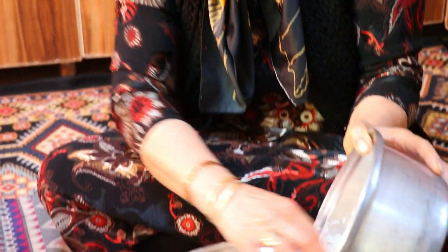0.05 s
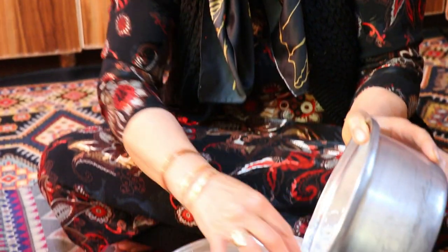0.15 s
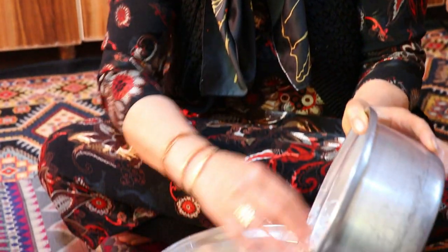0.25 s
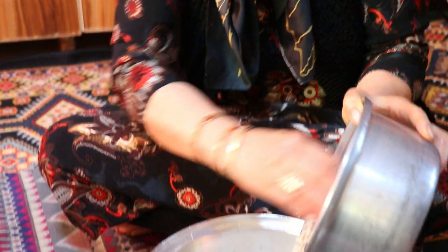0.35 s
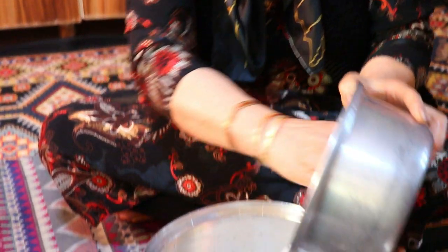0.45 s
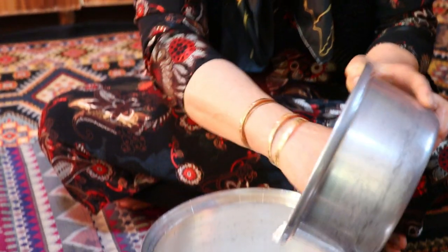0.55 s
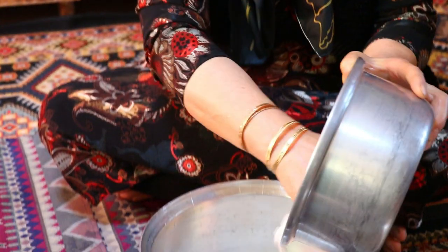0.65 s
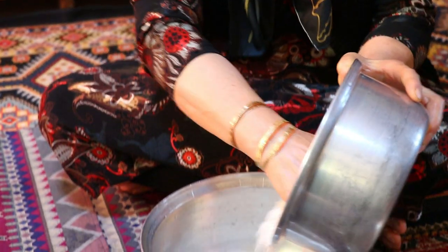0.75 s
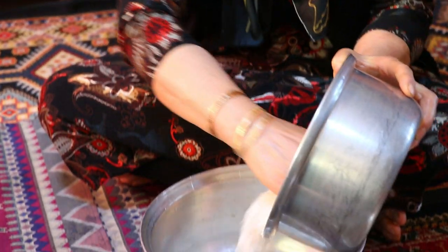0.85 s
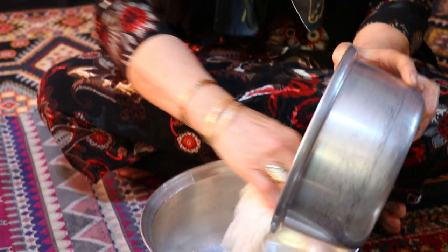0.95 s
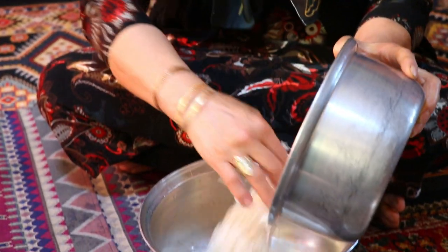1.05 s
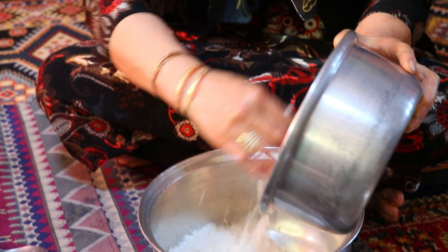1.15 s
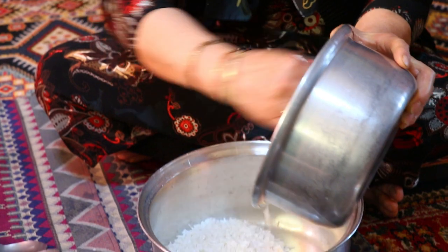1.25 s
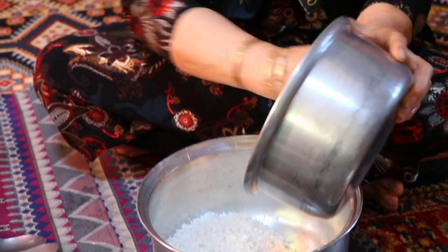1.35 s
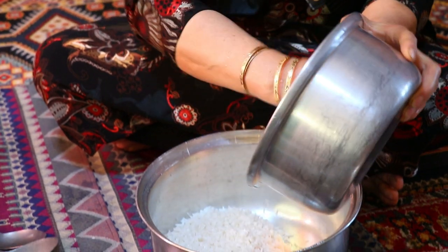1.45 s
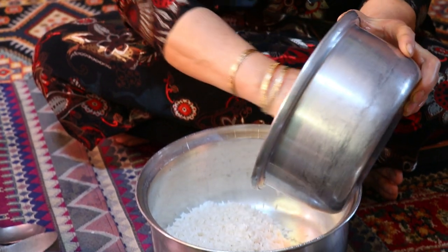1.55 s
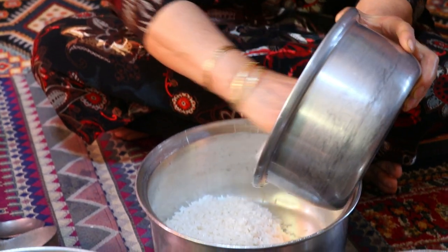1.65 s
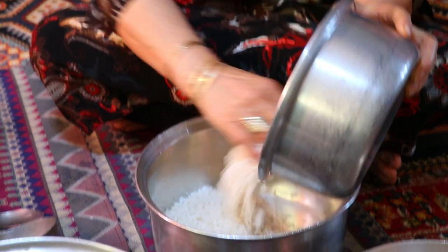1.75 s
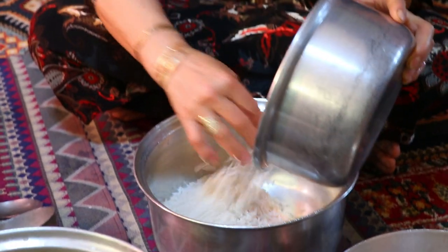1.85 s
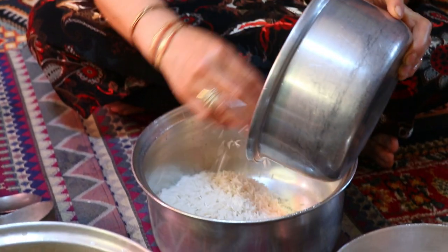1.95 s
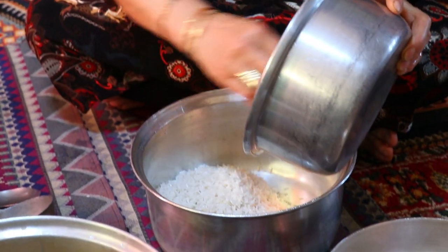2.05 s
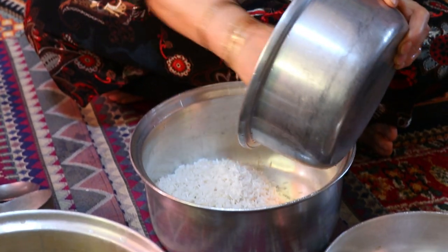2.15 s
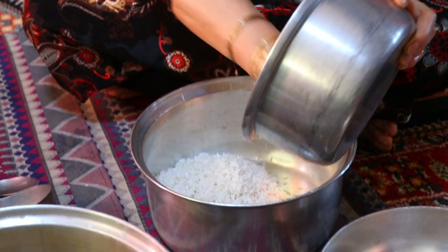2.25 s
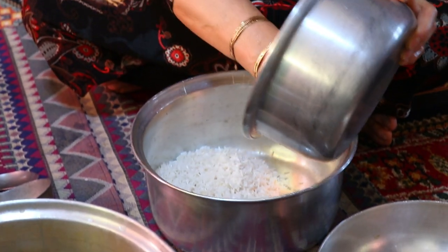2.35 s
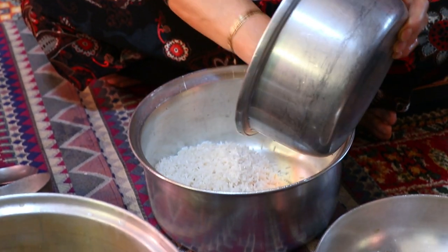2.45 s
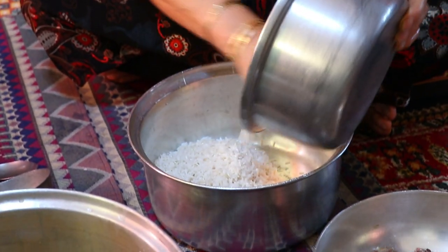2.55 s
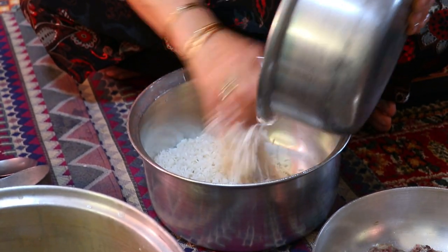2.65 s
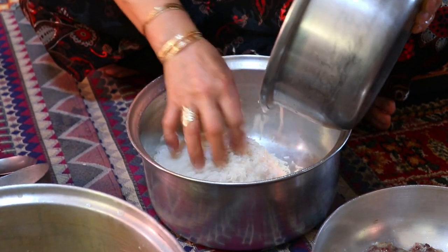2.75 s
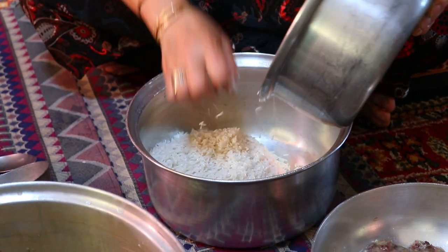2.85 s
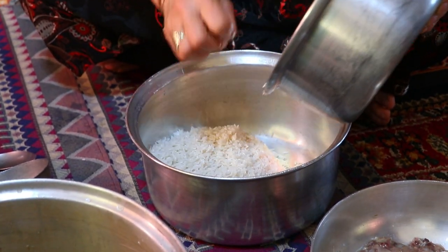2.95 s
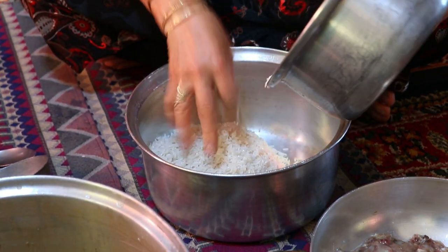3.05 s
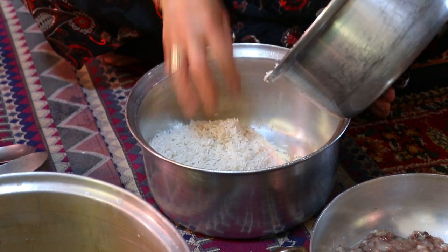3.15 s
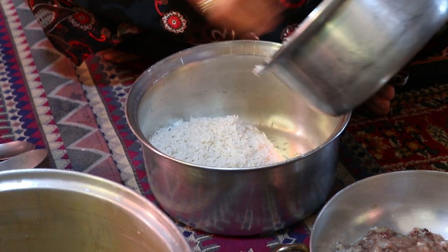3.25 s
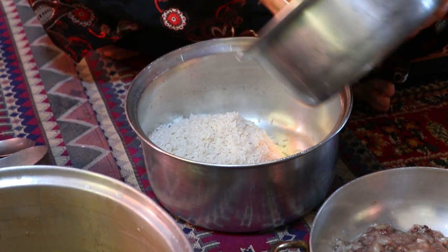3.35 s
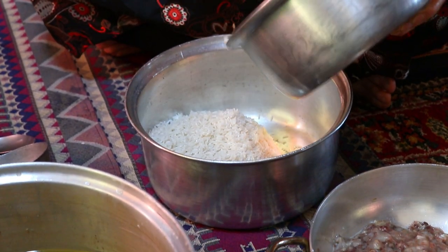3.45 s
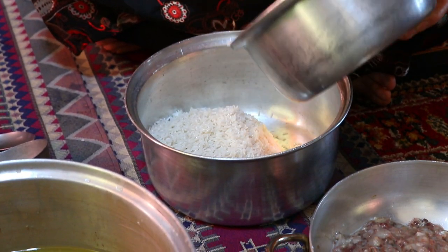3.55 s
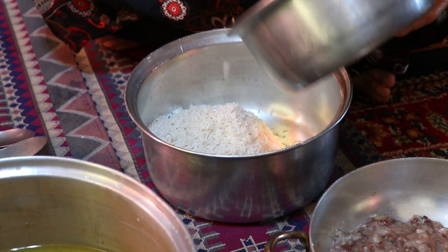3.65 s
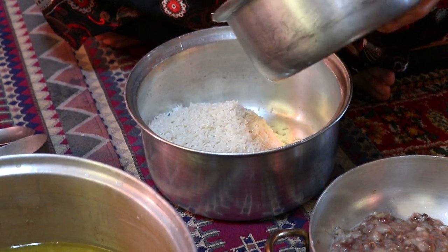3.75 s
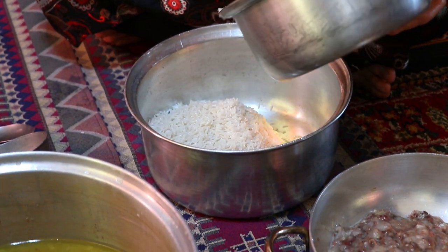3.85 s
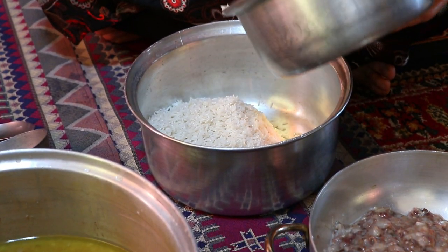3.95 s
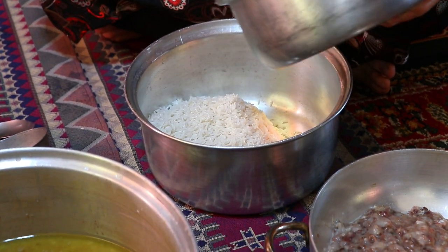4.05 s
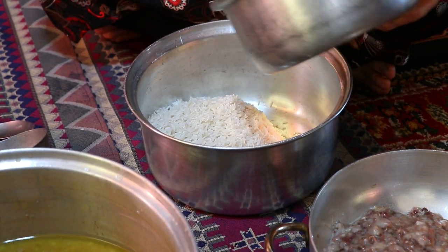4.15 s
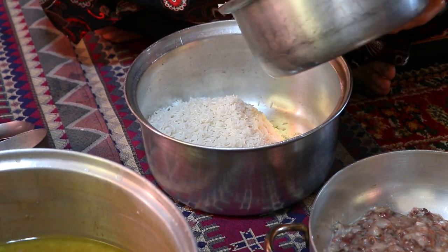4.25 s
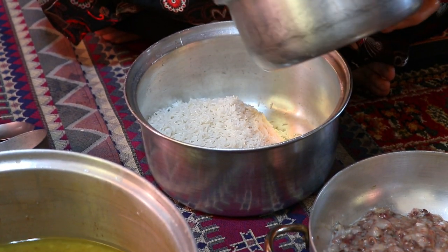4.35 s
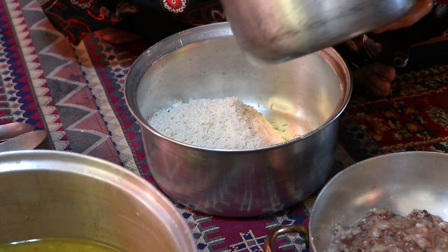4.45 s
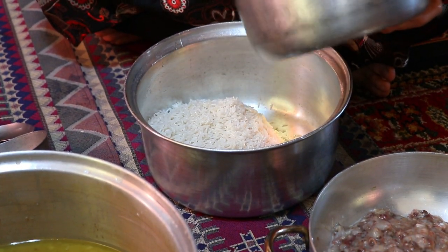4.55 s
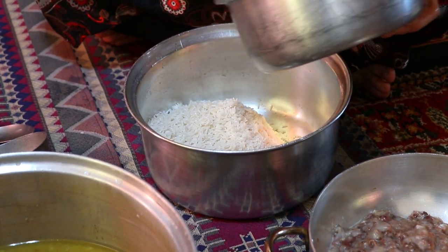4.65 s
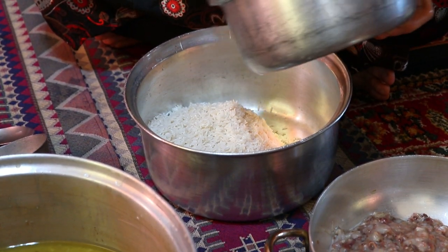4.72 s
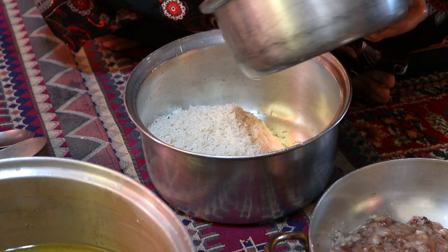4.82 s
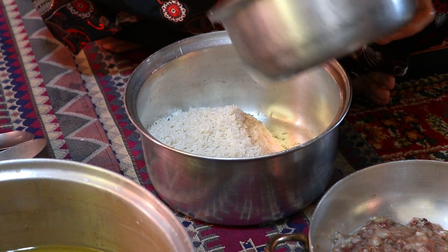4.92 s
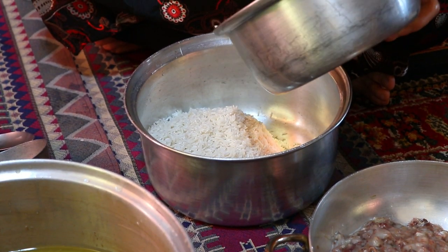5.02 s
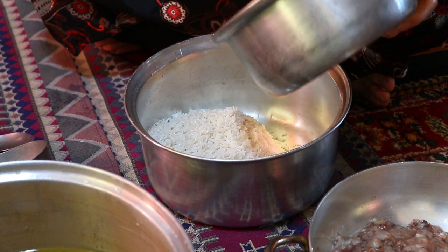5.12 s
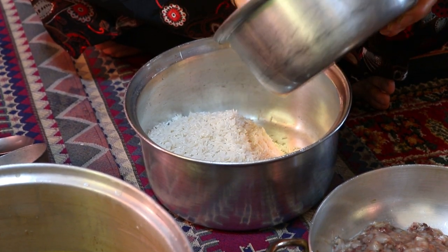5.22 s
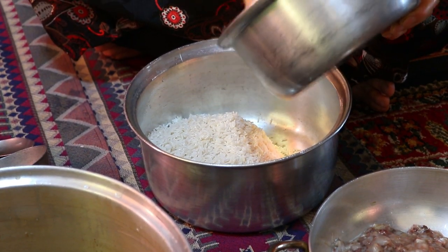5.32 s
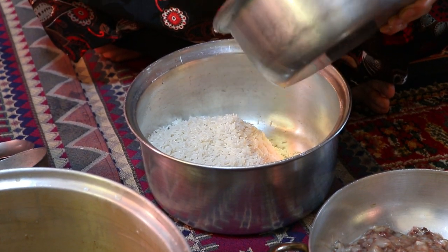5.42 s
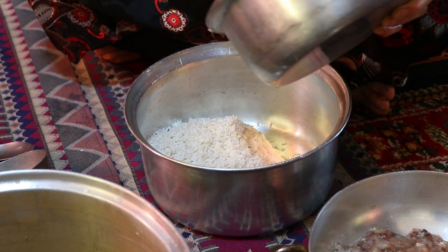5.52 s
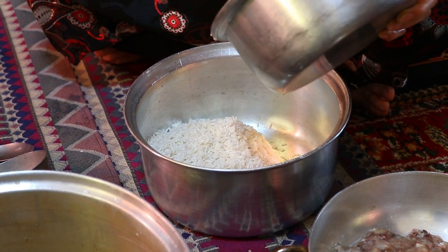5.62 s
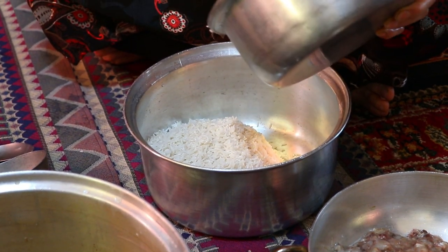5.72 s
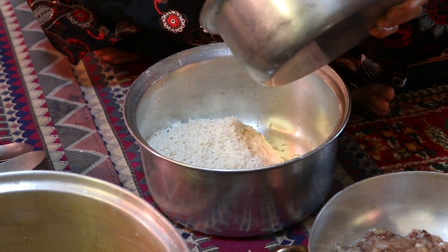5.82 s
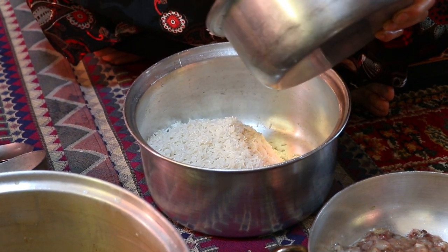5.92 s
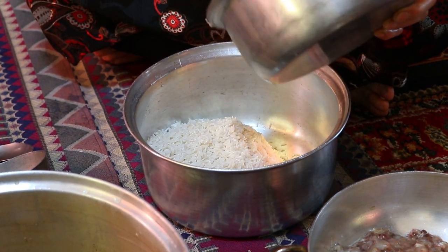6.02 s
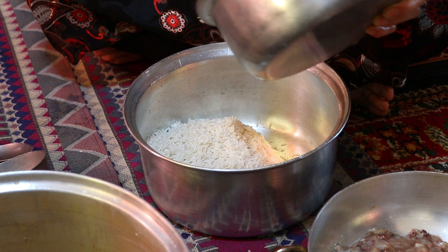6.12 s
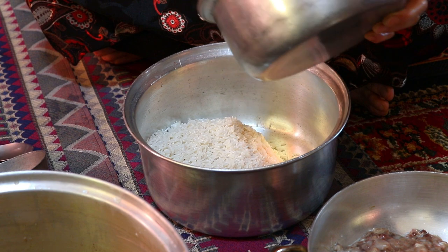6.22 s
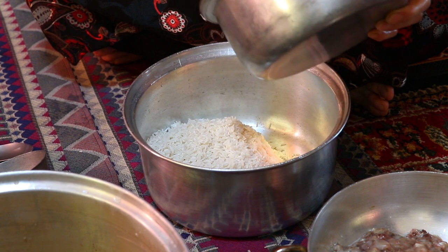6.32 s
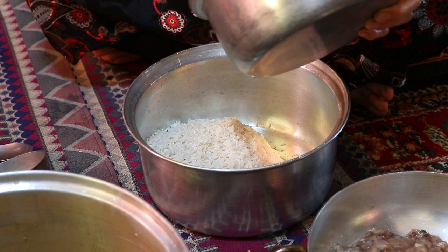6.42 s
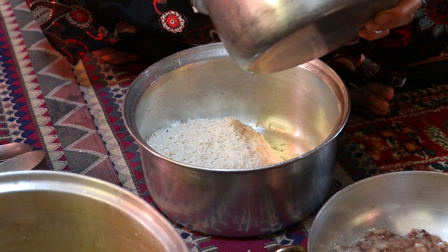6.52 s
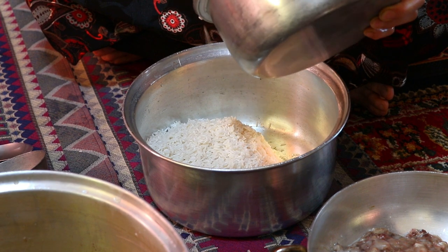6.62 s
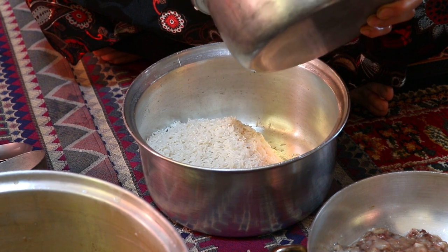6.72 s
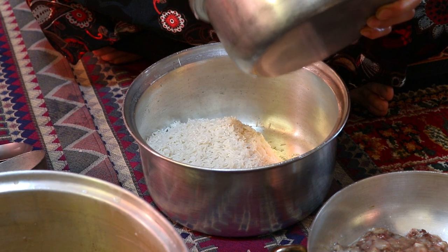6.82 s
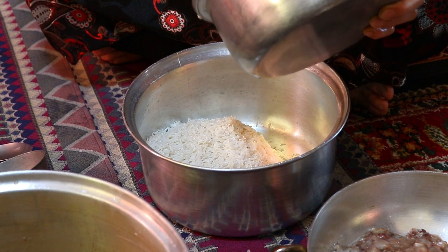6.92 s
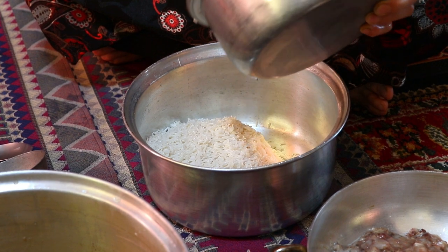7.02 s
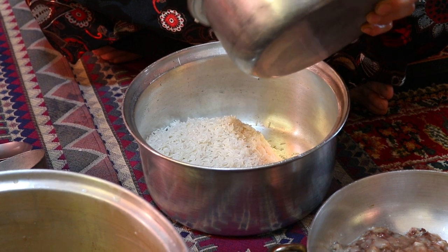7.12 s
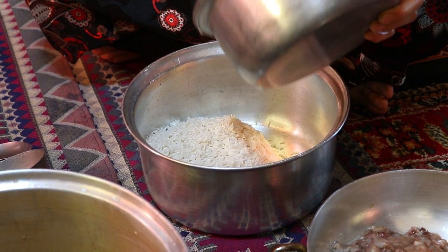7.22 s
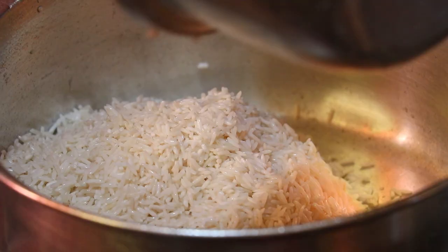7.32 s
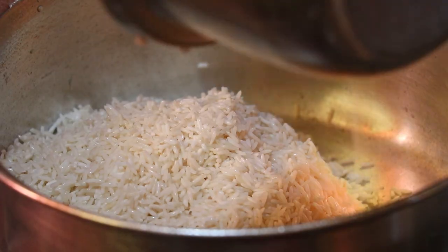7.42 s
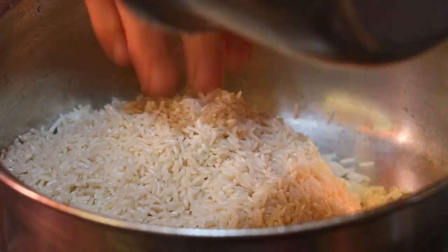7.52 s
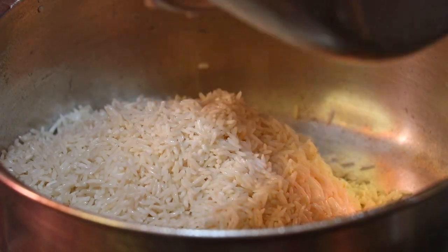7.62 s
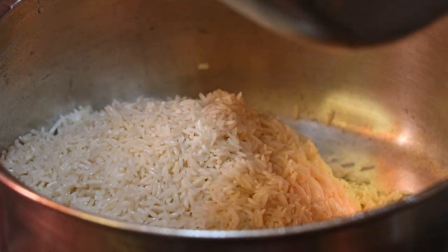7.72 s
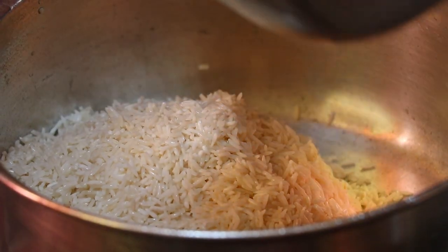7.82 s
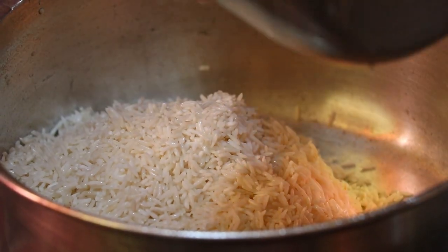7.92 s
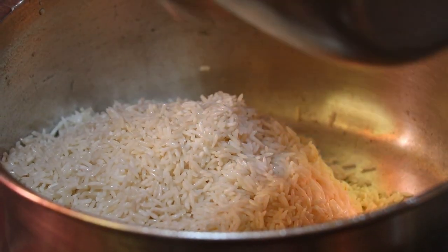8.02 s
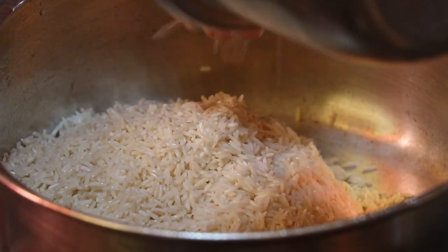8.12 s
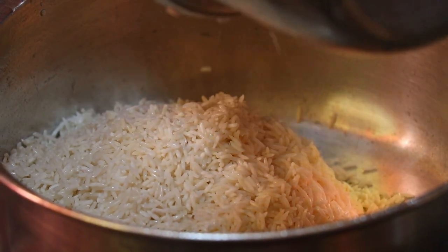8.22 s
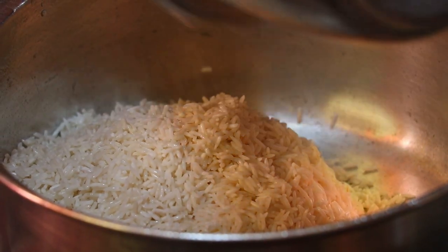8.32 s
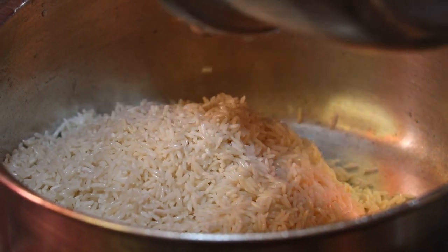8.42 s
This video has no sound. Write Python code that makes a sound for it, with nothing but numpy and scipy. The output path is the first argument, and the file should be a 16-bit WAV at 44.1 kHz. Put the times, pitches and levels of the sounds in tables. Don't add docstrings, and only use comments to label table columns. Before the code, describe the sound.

Dry rice rustles and scrapes out of a metal pot as bangles tick, then sparser dull knocks and rubs on the emptied pot in a quiet carpeted room.

```python
import sys
import numpy as np
from scipy import signal
from scipy.fft import rfft, irfft, next_fast_len
from scipy.io import wavfile
from scipy.ndimage import uniform_filter1d

SR = 44100
rng = np.random.default_rng(int(sys.argv[2]) if len(sys.argv) > 2 else 0)


def store_pcm(level_fs):
    pcm = np.round(np.clip(level_fs, -1, 1) * 32767).astype(np.int16)
    wavfile.write(sys.argv[1], SR, np.atleast_2d(pcm).T)


def volts(x):
    e = np.asarray(x, float) / 20
    return 10 ** e


N = 373527

# (frequency [Hz], level [dB], t60 [s])
FULL_BELLY_MODES = [(208.6, -15.5, 0.46), (323, -9, 0.37), (377.9, -4, 0.4), (415.86, -5, 0.42),
                    (479.5, 1.5, 0.1), (543.4, -6.5, 0.29), (600, 4, 0.057), (682, -4.5, 0.17),
                    (1030, -16, 0.083), (1150, -19.5, 0.055), (1485, -5.5, 0.31)]
FULL_WALL_MODES = [(1050, 3.5, 0.059), (1410, -6, 0.18), (1620, -2, 0.051), (2296, 5, 0.34),
                   (2574, 9, 0.24), (2990, 5.5, 0.23), (3250, -15, 0.045), (3770, -17, 0.04),
                   (4060, 13, 0.32), (4180, 12, 0.24), (4480, 0, 0.047), (5040, 13, 0.073)]
# (frequency [Hz], level [dB], t60 [s])
EMPTY_BELLY_MODES = [(391.8, 5, 0.0283), (614, -1, 0.03), (728, 3.5, 0.067), (820, -7.5, 0.037),
                     (1087, 2.5, 0.051), (1204, 2.5, 0.045), (1340, -5, 0.025)]
EMPTY_WALL_MODES = [(1608, -3, 0.047), (2059, 0, 0.0398), (2254, -3.5, 0.049), (2845, 4.5, 0.032),
                    (3160, 2.5, 0.038), (3520, -5, 0.0365), (4060, -9, 0.05)]
# (frequency [Hz], density [dB per Hz])
SNAP_SPECTRUM = [(410, -19.5), (700, -8.5), (1780, -11), (2570, -8.5), (3960, -10.5), (5280, -7.5),
                 (7820, -1.5), (14700, -21), (16100, -33)]
EMPTIED_S = 3.0
BUZZ = dict(longest_s=0.15, rough=0.45)


def evened(x):
    return x / np.sqrt(np.mean(x ** 2) + 1e-20)


def read(points, hz):
    f, value = np.transpose(points)
    return np.interp(np.log(hz + 1), np.log(f + 1), value)


def add(mix, s, sound):
    part = mix[:, round(s * SR):][:, :sound.shape[1]]
    part += sound[:, :part.shape[1]]


def through(x, taps):
    return signal.oaconvolve(x, np.atleast_2d(taps), axes=1)[:, :N]


def drift(samples):
    once = uniform_filter1d(rng.standard_normal(N), samples)
    return evened(uniform_filter1d(once, samples))


def colour(spectrum):
    db = np.maximum(read(spectrum, abs(np.fft.fftfreq(4096, 1 / SR))), -100)
    phased = np.exp(np.conj(signal.hilbert(np.log(volts(db)))))
    taps = np.fft.ifft(phased).real[:2048]
    return taps / np.linalg.norm(taps)


def resonate(x, hz, width_hz):
    turn = np.exp(2j * np.pi * np.cumsum(hz) / SR)
    r = np.exp(-np.pi * width_hz / SR)
    return 2 * (turn * signal.lfilter([1 - r], [1, -r], x / turn + 1e-18)).real


def ring(modes, crowd, spread, count=1, longest_s=0.45, rough=0., spot_db=0.5):
    hz, db, t60 = np.repeat(modes, 3, axis=0).T
    hz = hz * (1 + crowd * np.tile([-1, 0, 1.3], len(modes)))
    t = np.arange(SR // 4) / SR
    fade = volts(db[:, None] - 60 * t / np.clip(t60, .01, longest_s)[:, None])
    waves = fade * np.exp(2j * np.pi * hz[:, None] * t)
    spot, phase, left, right = rng.standard_normal((count, len(hz), 4)).T[..., None]
    sides = spread * np.sqrt(hz / 1000)[:, None, None] * np.concatenate([left, right], 2)
    weights = volts(spot_db * spot) * np.exp(1j * (phase + sides))
    out = np.einsum("mcp,mt->cpt", weights, waves, optimize=True).imag
    out = out * np.minimum(t / 0.0004, 1)
    rattle = uniform_filter1d(rng.standard_normal((count, 1, len(t))), size=150)
    out = out * (1 + rough * evened(rattle))
    return out / np.linalg.norm(out[:, :1], axis=2, keepdims=True)


def air():
    # (frequency [Hz], density [dB per Hz])
    hush_spectrum = [(12, -25), (20, -8), (123, 0.5), (389, -7.5), (447, -3), (783, -10.5), (3170, -17.5),
                     (4830, -26), (6390, -20.5), (9200, -22), (14800, -32.5), (16100, -45)]
    # (frequency [Hz], left-right likeness [0..1])
    likeness = [(30, 0.79), (150, 0.83), (600, 0.27), (2000, 0.053), (12000, 0.031)]
    # (time [s], width [s], level [dB])
    creaks = [
        (2.85, 0.076, 0.87),
        (5.2, 0.26, 3.5),
        (7.122, 0.031, 11.3),
        (8.0, 0.12, 1.9),
        (8.3, 0.11, 5.9),
    ]
    # (frequency [Hz], level [dB])
    motor = [(441.4, -68.5)]
    frames, hz = N // 256 + 5, np.fft.rfftfreq(1024, 1 / SR)
    a, b, c, d, patches = rng.standard_normal((frames, 513, 5)).T
    patches = evened(uniform_filter1d(uniform_filter1d(patches, 5, 0), 30, 1))
    same = np.clip(read(likeness, hz), -1, 1)[:, None]
    left = a + 1j * b
    z = np.array([left, same * left + np.sqrt(1 - same ** 2) * (c + 1j * d)])
    z *= volts(read(hush_spectrum, hz)[:, None] + 2.0 * patches)
    t = (np.arange(frames) - 2) * 256 / SR
    creak_db = sum(db * np.exp(-((t - s) / w) ** 2) for s, w, db in creaks)
    z *= volts((hz < 240)[:, None] * creak_db)
    hush = volts(-60) * evened(signal.istft(z, nperseg=1024, noverlap=768)[1][:, :N])
    waver = 2.5 + 2.2 * drift(6000)
    hum = sum(volts(db + waver) * np.sin(2 * np.pi * f * np.arange(N) / SR) for f, db in motor)
    return hush + hum


def room(x):
    # (frequency [Hz], t60 [s])
    decay = [(250, 0.19), (1000, 0.47), (4000, 0.29), (12000, 0.28)]
    taps = np.zeros((2, SR // 2))
    slots = np.arange(200, SR // 2 - 20, 20)
    at = slots + rng.integers(0, 20, (2, len(slots)))
    np.put_along_axis(taps, at, rng.choice([-1., 1.], at.shape), 1)
    hz, t, z = signal.stft(taps, SR, nperseg=256)
    tail = signal.istft(z * volts(-60 * t / read(decay, hz)[:, None]), SR, nperseg=256)[1]
    return through(x.mean(0)[None], tail / np.linalg.norm(tail[0]))


def ticks():
    # (time [s], peak [dB], ring [Hz])
    bangles = [(0.0732, -11.5, 7450), (0.125, -22, 7000), (0.153, -20, 7230), (0.1784, -12, 8520),
               (0.196, -29, 8000), (0.262, -26, 7000), (0.33, -21.5, 7540), (0.391, -26, 6860),
               (0.4114, -25.5, 9280), (0.4576, -20.5, 7770), (0.4933, -23, 6750), (0.557, -35, 6940),
               (0.843, -20, 7980), (1.106, -24, 7060), (1.151, -24.5, 7500), (1.237, -44, 5940),
               (1.2665, -33, 7310), (1.359, -34.5, 8760), (1.3857, -37, 8000), (1.403, -30.5, 8400),
               (1.48, -30.5, 8100), (1.736, -37, 7060), (1.8361, -28.5, 7460), (1.921, -27, 8600),
               (1.9386, -27, 7770), (1.963, -32, 7000), (1.976, -35, 7200), (2.161, -40.5, 7820),
               (2.189, -41, 6760), (2.211, -37, 7000), (2.736, -29.5, 7050), (2.775, -23.5, 8400),
               (2.794, -28, 7600), (2.8409, -35, 7500), (2.909, -24, 7900), (2.946, -34, 5800),
               (2.972, -33, 7000), (3.1347, -36.5, 7850), (3.6787, -30, 8600), (4.4734, -27.5, 6540),
               (4.807, -65, 7800), (4.95, -36, 8100), (4.9832, -46, 8500), (5.1504, -36, 8500),
               (5.351, -47, 8050), (5.412, -42, 7760), (6.471, -41, 8800), (7.2124, -40, 6700),
               (7.3912, -32.5, 7560), (7.561, -36, 7100), (7.6213, -27.5, 7050)]
    # (time [s], peak [dB], ring [Hz], t60 [s])
    strays = [(0.5864, -31.5, 1825, 0.099), (0.587, -25, 3770, 0.017), (0.8028, -24.5, 4060, 0.028),
              (0.967, -29, 4105, 0.066), (1.6019, -25, 2447, 0.076), (2.0552, -28, 4700, 0.035),
              (2.2229, -13, 2440, 0.024), (2.5341, -20.5, 4250, 0.054), (2.4595, -32, 3550, 0.022),
              (2.5223, -28, 3330, 0.014), (3.19, -43.5, 2385, 0.16), (3.2345, -31, 4200, 0.032),
              (3.362, -39, 2630, 0.016), (3.5117, -49, 3300, 0.0346), (3.895, -36, 3054, 0.053),
              (4.125, -34, 1410, 0.018), (4.2, -28, 2940, 0.018), (4.781, -40.5, 2150, 0.089),
              (4.9836, -37, 3210, 0.025), (6.6709, -36, 2250, 0.035), (7.1023, -21, 3150, 0.0086),
              (7.2105, -38.5, 3240, 0.035), (7.248, -34, 940, 0.013), (7.416, -33.5, 2840, 0.0255),
              (7.5275, -23, 2464, 0.021), (7.6075, -27.5, 1390, 0.012), (8.4175, -43, 6000, 0.027),
              (8.434, -35.5, 2890, 0.034)]
    bangle_t60 = 0.035
    out, t, snap = np.zeros((2, N)), np.arange(SR // 8) / SR, colour(SNAP_SPECTRUM)
    for s, db, hz, t60 in strays + [(*row, bangle_t60) for row in bangles]:
        fade = volts(-60 * t / np.clip(t60, .008, .4)) * np.minimum(t / 0.0013, 1)
        a, b = rng.standard_normal((2, len(t)))
        broad = signal.oaconvolve([a, 0.46 * a + 1.14 * b] * fade, snap[None], axes=1)[:, :len(t)]
        near_ring = resonate(fade * np.array([a, b]), hz + 0 * t, hz / 5)
        turns = hz * np.array([[1], [1.04], [1.31], [1.58]]) * t + rng.random((4, 1))
        partials = ([[1], [.7], [.15], [.15]] * np.sin(2 * np.pi * turns)).sum(0) * fade ** 0.44
        add(out, s, 0.34 * volts(db) * (0.62 * broad + near_ring))
        add(out, s, 0.16 * np.sqrt(1800 / hz) * volts(db) * partials[None])
    return out


def strike():
    # (time [s], peak [dB], left-right [dB])
    blows = [
        (5.548, -14.5, -3.5),
    ]
    # (frequency [Hz], level [dB], t60 [s])
    struck_modes = [(1030, -9.5, 0.07), (1648, -29, 0.048), (2053, 8, 0.038), (2015, -10, 0.28),
                    (1300, -10.5, 0.033), (3035, -24, 0.077), (2500, -39.5, 0.05), (2770, -4.5, 0.069),
                    (3940, 5, 0.0087), (7000, -18.5, 0.099), (7700, -15, 0.092), (8400, -23, .1)]
    out = np.zeros((2, N))
    for s, db, pan_db in blows:
        side = volts(db + pan_db * np.array([[.5], [-.5]]))
        add(out, s, 3.1 * side * colour(SNAP_SPECTRUM))
        add(out, s + 0.00057, 10.0 * side * ring(struck_modes, 0.0123, 0.042)[0])
    return out


def gesture(length, rise_s, change_db, fade):
    t = np.arange(round((length + .4) * SR)) / SR
    held = np.minimum(t / length, 1) - (change_db > 0)
    db = change_db * held - fade * np.maximum(t - length, 0)
    return (np.minimum(t / rise_s, 1) * volts(db)) ** 2


def sings():
    # (start [s], length [s], level [dB], frequency [Hz])
    slips = [(0.0, 0.071, -39.5, 201), (0.048, .18, -40, 392), (0.802, 0.037, -49, 1410),
             (.81, 0.088, -51, 2540), (0.804, 0.051, -51, 2880), (1.597, .06, -46, 2595),
             (2.226, 0.047, -43, 310), (3.469, 0.035, -50.5, 610), (4.839, 0.065, -54, 605),
             (6.201, 0.024, -60, 3140), (6.205, 0.021, -60, 2300), (6.241, 0.047, -52, 1150),
             (7.205, .02, -54, 6360), (0.016, 0.032, -25, 528), (0.061, 0.024, -28, 514),
             (0.035, 0.045, -39, 1430), (0.169, 0.027, -36, 1083), (2.22, .012, -35.5, 1670),
             (2.229, .02, -38.5, 1020), (2.226, .02, -43.5, 2060), (2.226, 0.0094, -39, 3830),
             (2.538, .02, -40.5, 2580), (2.529, 0.0214, -44, 4215), (2.835, 0.028, -37.5, 4300),
             (2.842, .03, -53, 2500), (3.192, 0.0342, -60, 2356), (3.185, 0.024, -55, 4170),
             (3.615, .03, -51, 1020), (3.56, .03, -57, 2200), (3.752, 0.077, -54, 720),
             (3.886, 0.043, -60, 1017), (3.9, 0.023, -61, 3150), (4.515, 0.024, -64, 2060),
             (4.519, 0.0495, -65, 3580), (4.52, .04, -60, 3250), (4.567, 0.016, -55, 2030),
             (4.57, .04, -58, 2790), (4.58, .04, -59.5, 3360), (4.578, 0.026, -59, 1150),
             (4.607, 0.04, -71, 2060), (4.659, .025, -62.5, 3310), (4.103, .02, -49, 560),
             (4.812, .012, -36.5, 580), (4.94, 0.021, -59, 1150), (4.98, 0.013, -52, 3400),
             (4.972, 0.012, -57, 2870), (7.205, 0.015, -45, 3310), (7.302, 0.0435, -55, 1130),
             (7.315, .045, -64, 2280), (7.422, .05, -69, 2950)]
    out, width_hz = np.zeros((2, N)), 76
    for s, length, db, hz in slips:
        press = np.sqrt(gesture(length, 0.0015, -2.4, 990))[:round((length + .15) * SR)]
        a, b = rng.standard_normal((2, len(press)))
        skin = np.array([a, 1.1 * a + .5 * b])
        tone = resonate(resonate(skin, hz + 0 * a, width_hz), hz + 0 * a, 3 * width_hz)
        add(out, s, volts(db) * press * evened(tone))
    return out


def knocks():
    # (time [s], blow [dB], brightness [dB], palm [dB])
    blows = [(0.063, -30, -4, -26), (0.801, -28.5, 2.5, -9), (0.967, -29, 5, -11), (1.382, -55, 6, -28),
             (1.6, -24, 0, -6), (1.772, -45, -3, -26), (2.221, -28, 4, -31), (2.531, -31, 6, -10.5),
             (3.47, -42.5, -22, -5), (3.486, -52.5, -25, 12.5), (3.756, -34.5, -24, -45),
             (4.106, -37, -26, -22), (4.812, -25, -23, -13), (5.148, -25, -21, -22.5),
             (5.856, -32, -42, -9.5), (6.198, -53, -1, -26), (6.482, -42, -22, -3), (6.833, -49, -24, -27),
             (7.142, -23.5, -25, -23.5), (7.245, -45.5, -7, -9.5), (7.413, -35.5, -8.5, -10),
             (7.838, -48.5, -15, -1), (8.354, -43, -27, -5.5)]
    # (frequency [Hz], density [dB per Hz])
    thud_spectrum = [(100, -62.5), (170, 2.5), (300, 11), (540, 13.5), (900, -1.5), (3000, -108)]
    out, palm = np.zeros((2, 2, N))
    n = len(blows)
    full = ring(FULL_BELLY_MODES, 0.036, 0.16, n), ring(FULL_WALL_MODES, 0.00816, 0.48, n, **BUZZ)
    empty = ring(EMPTY_BELLY_MODES, 0.081, 0.36, n), ring(EMPTY_WALL_MODES, 0.051, 0.19, n)
    for k, (s, db, bright_db, palm_db) in enumerate(blows):
        belly, wall = full if s < EMPTIED_S else empty
        add(out, s + 0.00198, volts(db + 1.5) * belly[k])
        add(out, s + 0.00207, volts(db + bright_db + 17.5) * wall[k])
        burst = rng.standard_normal(2000) * np.exp(-np.arange(2000) / 500)
        add(palm, s, volts(db + palm_db + 1.0) * burst * [[1], [1]])
    return out + through(palm, colour(thud_spectrum))


def grains(per_s, spread_db, same, clump_db):
    height = volts(spread_db * np.minimum(rng.exponential(1, (2, N)), 4)) * rng.choice([-1, 1], (2, N))
    falls = rng.random((2, N)) < per_s / SR
    a, b = evened(height * falls * volts(clump_db * drift(500)))
    return np.array([a, same * a + np.sqrt(1 - same ** 2) * b])


def pot(drive, full, empty, crowd, spread, spot_db, damped={}):
    spot_s, spots = 0.16, 14
    bared_s = 1.37, 1.59
    hop, out = round(spot_s * SR), np.zeros((2, N))
    full_rings = ring(full, 2 * crowd, spread, spots, **damped, spot_db=spot_db)
    empty_rings = ring(empty, crowd, spread, spots, spot_db=spot_db)
    padded = np.pad(drive, [(0, 0), (0, 2 * hop)])
    window = np.sin(np.pi * np.arange(2 * hop) / (2 * hop))
    for k in range(N // hop + 1):
        s = (k + 1) * spot_s
        bare = s > EMPTIED_S or bared_s[0] < s < bared_s[1]
        taps = (empty_rings if bare else full_rings)[k % spots]
        fade = window if k else np.maximum(window, np.arange(2 * hop) < hop)
        add(out, k * hop / SR, signal.oaconvolve(padded[:, k * hop:][:, :2 * hop] * fade, taps, axes=1))
    return out


def hand():
    # (time [s], belly [dB], wall [dB], grains [dB])
    jolts = [(0.0, -42, -33, -31.5), (0.801, -35, -41, -47), (0.969, -36, -46, -40.5),
             (1.382, -57, -60, -52.5), (1.602, -34, -39, -41.5), (2.221, -37, -36.5, -35.5),
             (2.533, -39, -40.5, -42), (4.469, -85, -56, -53), (4.807, -52.5, -60, -49.5),
             (5.147, -56, -48.5, -47), (5.547, -48.5, -35, -37), (6.197, -57, -66, -71),
             (6.833, -52.5, -70, -69), (7.102, -66.5, -50, -56), (7.208, -78, -47.5, -57),
             (7.391, -73, -57, -50.5), (7.525, -65, -47.5, -51), (7.62, -68, -76, -52)]
    jolt_fade = [
        [289],
        [260],
        [250],
    ]
    # (time [s], rise [s], wall [dB], bangles [dB])
    flicks = [
        (1.964, 0.014, -41, -27.5),
        (2.825, 0.012, -38, -25),
        (3.182, 0.00356, -52, -34.5),
    ]
    # (start [s], length [s], pressure [dB], hollow under the hand [Hz])
    drags = [(-0.007, 0.0815, -38, 520), (0.095, 0.16, -49, 653), (0.277, 0.41, -66, 657),
             (1.01, 0.17, -62.5, 555), (1.363, 0.18, -61.5, 820), (1.719, 0.12, -53, 540),
             (1.919, 0.11, -59.5, 455), (2.209, .02, -47, 600), (2.327, 0.16, -58.5, 523),
             (2.606, 0.18, -69.5, 436), (3.505, 0.2, -57.5, 665), (3.552, 0.096, -56.5, 1030),
             (3.739, 0.073, -60.5, 764), (3.861, 0.068, -55.5, 970), (4.092, 0.33, -64, 694),
             (4.544, 0.056, -71.5, 700), (4.84, .07, -73, 645), (4.9, 0.18, -63.5, 1080),
             (5.186, 0.14, -63.5, 640), (5.59, 0.086, -53, 820), (5.862, 0.15, -52, 706),
             (5.954, 0.046, -53.5, 1050), (6.186, 0.09, -50, 890), (6.464, 0.15, -60.5, 700),
             (6.554, 0.12, -62, 1050), (6.828, 0.085, -57, 820), (7.103, 0.029, -60, 600),
             (7.206, 0.21, -66, 860), (7.313, 0.021, -54.5, 1170), (7.833, 0.33, -71, 720),
             (8.39, 0.187, -77, 423)]
    # (start [s], length [s], wall [dB], grains [dB])
    slides = [(0.0, 0.11, -35, -30.5), (0.111, 0.074, -33.5, -29), (0.19, 0.031, -39.5, -39),
              (0.235, 0.08, -47.5, -39.5), (0.357, 0.3, -54.5, -53.5), (0.616, 0.34, -53, -57),
              (0.991, 0.08, -49, -52.5), (1.072, 0.16, -50.5, -44), (1.627, 0.17, -52.5, -61),
              (1.695, 0.24, -55, -52.5), (1.993, 0.062, -46, -47), (2.574, 0.12, -53.5, -56.5),
              (2.715, 0.094, -50.5, -45.5), (3.124, 0.03, -63.5, -57.5), (3.476, 0.2, -50.5, -52.5),
              (3.855, 0.11, -56, -53), (4.064, 0.28, -56.5, -55), (4.992, .12, -58.5, -61.5),
              (5.162, 0.14, -61, -60), (5.329, 0.076, -57, -52), (5.554, 0.14, -53.5, -51.5),
              (5.861, 0.14, -52.5, -57), (6.104, 0.018, -78, -64.5), (6.183, 0.11, -57.5, -63.5),
              (6.502, 0.15, -62.5, -68), (6.833, 0.074, -62.5, -67), (4.634, 0.042, -70, -64.5),
              (3.725, 0.09, -61, -58), (7.888, 0.147, -72, -65.5)]
    # (start [s], length [s], wall [dB], grains [dB])
    strokes = [(1.459, 0.11, -55.5, -52.5), (2.383, 0.13, -49.5, -50), (3.64, 0.042, -80, -41.5),
               (4.506, 0.076, -55.5, -57), (4.852, 0.15, -50, -55), (6.635, 0.053, -56.5, -54),
               (7.277, 0.074, -56.5, -64), (7.985, 0.11, -51.5, -51), (8.401, 0.036, -52, -49)]
    cupped_hz, opens_s = 523, 0.029
    power, hollow, t = np.zeros((3, N)), np.full((1, N), 1e-9), np.arange(SR // 2) / SR
    hollow_hz = cupped_hz * hollow
    for s, *db in jolts:
        add(power, s, (volts(np.c_[db] - jolt_fade * t) * np.minimum(t / 0.001, 1)) ** 2)
    for s, rise_s, *db in flicks:
        add(power[1:], s, (volts(np.c_[db] - jolt_fade[1:] * t) * np.minimum(t / rise_s, 1)) ** 2)
    for s, length, db, hz in drags:
        press = volts(db) ** 2 * gesture(length, 0.019, -2.5, 363)[None]
        opening = np.minimum(np.arange(press.shape[1]) / SR / opens_s, 1)
        add(power[:1], s, press)
        add(hollow, s, press)
        add(hollow_hz, s, press * (cupped_hz + (hz - cupped_hz) * opening))
    for s, length, *db in slides:
        add(power[1:], s, volts(np.c_[db]) ** 2 * gesture(length, 0.254 * length, 2, 207))
    for s, length, *db in strokes:
        add(power[1:], s, volts(np.c_[db]) ** 2 * gesture(length, 0.023, 12, 310))
    return *np.sqrt(power + 1e-14), (hollow_hz / hollow)[0]


def sweeps():
    # (frequency [Hz], density [dB per Hz])
    scratch_spectrum = [(500, -33.5), (850, -8), (1060, -5.5), (1480, -9), (3600, -6.5), (5000, -16),
                        (7150, -31), (12100, -120)]
    # (frequency [Hz], density [dB per Hz])
    loose_spectrum = [(2060, -45), (3500, -17), (4210, -13), (5720, -3.5), (6460, 0.5), (11000, -6.5),
                      (16100, -21.5)]
    bare_spectrum = [(3000, -39), (4000, -16), (5200, -9), (6000, -2), (6400, 2.5), (7200, 0), (8600, 1.5),
                     (11800, -6.5), (16100, -18)]
    late_spectrum = [(3500, -40), (5400, -28), (5900, 2.5), (6500, 1.5), (7400, -7), (8300, -1.5),
                     (11800, -9.5), (16100, -25)]
    # (frequency [Hz], density [dB per Hz])
    jingle_spectrum = [(1290, -28), (2200, -23), (2450, -15), (3420, -17.5), (4300, -7), (5200, -9.5),
                       (7360, -2), (8270, -10), (11500, -15), (16100, -27)]
    # (from [s], to [s])
    shakes = [
        (1.964, 2.12),
        (2.826, 3.0),
        (3.183, 3.4),
    ]
    t = np.arange(N) / SR
    rub, scratch, rustle, hollow_hz = hand()
    shaken = sum((t > a) & (t < b) for a, b in shakes) > 0
    early = t < EMPTIED_S
    late = t > 7.7

    skin = grains(900, 0.65, 0.98, 3.06)
    under_hand = evened(resonate(resonate(skin, hollow_hz, 374), hollow_hz, 1160)) + 0.081 * skin
    belly = .5 * pot(rub * under_hand, FULL_BELLY_MODES, EMPTY_BELLY_MODES, 0.012, 0.22, 1.5)
    belly += 0.24 * rub * (under_hand - 0.28 * skin)

    slips = grains(2500, 2.34, 0.69, 1.96)
    wander = evened(resonate(slips, 2600 * volts(2.5 * drift(4000)), 1250))
    ringing = scratch * wander * ~shaken * np.where(early, .18, 0.19 + 0.22 * late)
    wall = pot(ringing, FULL_WALL_MODES, EMPTY_WALL_MODES, 0.009, 0.75, 3.6, BUZZ)
    scraping = scratch * slips * ~shaken * np.where(early, .8, .6 - 0.3 * late)
    wall += through(scraping, colour(scratch_spectrum))

    fine = rustle * grains(7000, 2.9, 0.27, 2.03)
    rice = through(fine * (early & ~shaken), colour(loose_spectrum))
    rice += through(fine * (~early & ~shaken & ~late), colour(bare_spectrum))
    rice += through(fine * late, colour(late_spectrum))
    jingle = through(fine * shaken, colour(jingle_spectrum))
    return belly + wall + rice + jingle


def scene():
    near = ticks() + strike() + sings() + knocks() + sweeps()
    near = signal.sosfilt(signal.butter(4, 140, "high", fs=SR, output="sos"), near)
    t = np.arange(N) / SR
    dipped = (t > 7.36) & (t < 7.389)
    dip = uniform_filter1d(volts(-20 * dipped), size=60)
    return air() + (near + volts(-8.0) * room(near)) * dip


def low_pass(x):
    return signal.sosfilt(signal.butter(12, 16250, fs=SR, output="sos"), x)


def record(dry):
    # (frequency [Hz], left-right [dB])
    lean = [(60, 2), (950, -2), (15000, -2.5)]
    padded = next_fast_len(N)
    lean_db = read(lean, np.fft.rfftfreq(padded, 1 / SR)) * [[.5], [-.5]]
    heard = np.arange(padded // 2 + 1) < 16150 * padded / SR
    mix = irfft(rfft(dry, padded) * volts(lean_db) * heard, padded)[:, :N]
    return low_pass(mix)


dry = scene()
out = record(dry)
store_pcm(out)
```